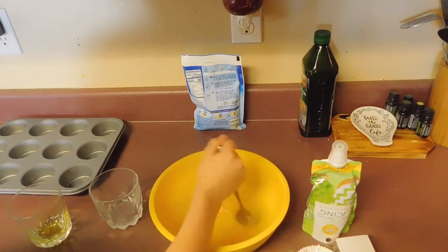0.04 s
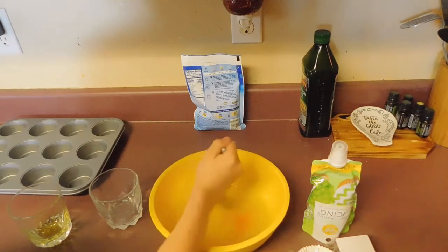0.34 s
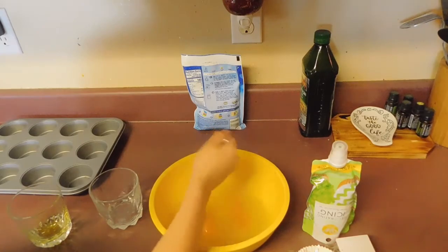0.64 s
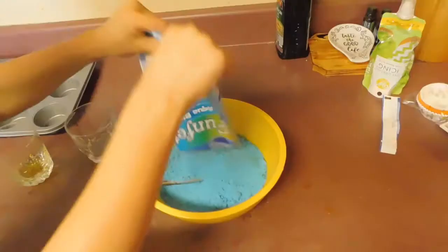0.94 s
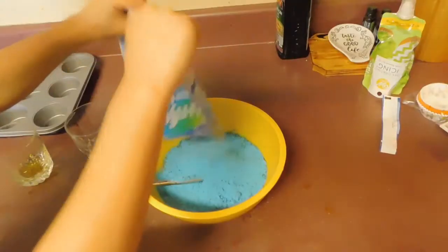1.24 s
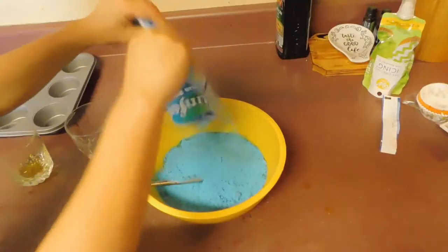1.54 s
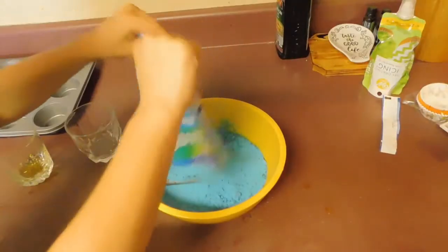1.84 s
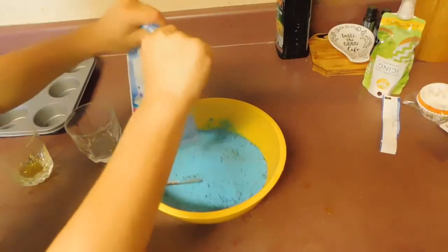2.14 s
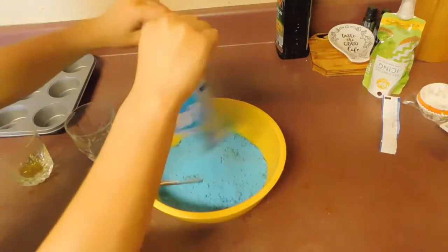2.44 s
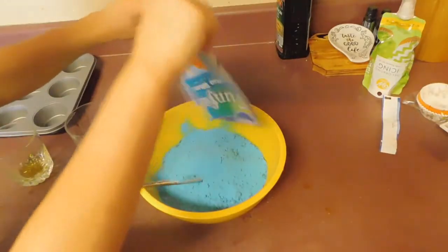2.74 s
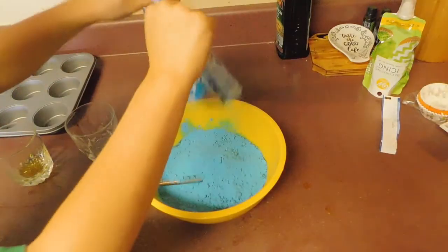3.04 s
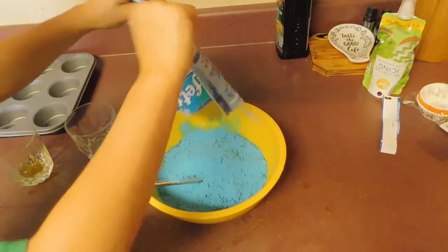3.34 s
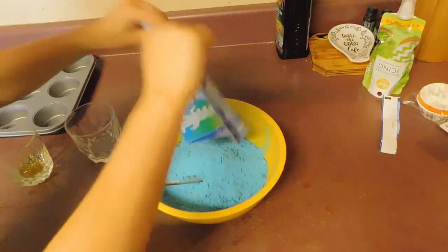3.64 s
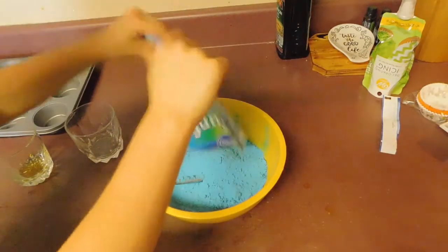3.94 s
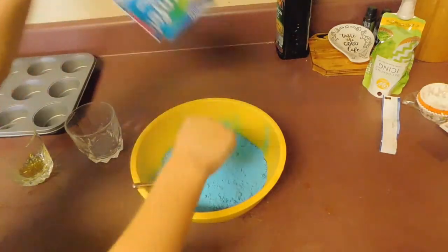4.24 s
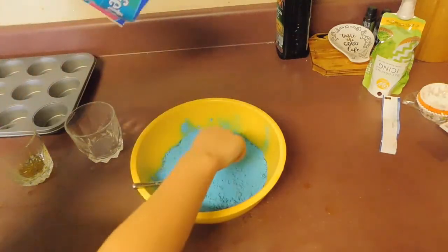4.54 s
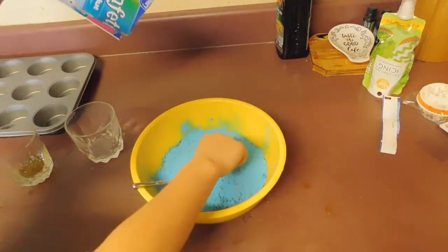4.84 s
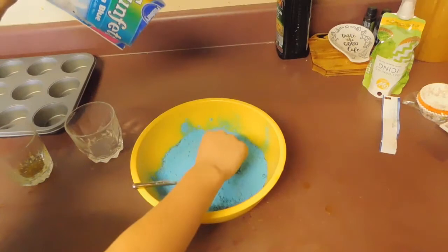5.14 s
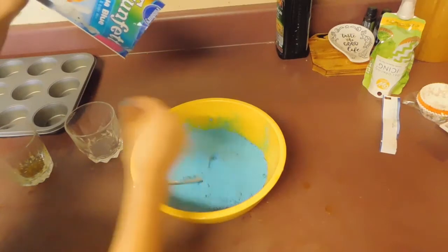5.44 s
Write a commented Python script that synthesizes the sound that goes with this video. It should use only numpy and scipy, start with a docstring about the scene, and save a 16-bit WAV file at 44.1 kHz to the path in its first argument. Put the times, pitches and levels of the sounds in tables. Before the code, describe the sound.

A wire whisk knocks and scrapes in a plastic bowl, then a plastic bag crinkles and snaps as powder is shaken out.

```python
"""Whisk and cake mix, close up

A small kitchen, a stereo pair close over a plastic mixing bowl. A wire whisk knocks three times and
scrapes round in circles, fading out at one second. It settles with a clink, and a plastic bag of cake
mix is shaken empty: the film snaps and crinkles, powder hisses out, the air in the bowl rings along.
Counter and wall answer briefly. At the end, over a quiet hum, a hand moves in the powder."""
import sys
import numpy as np
from scipy import signal
from scipy.fft import rfft, irfft, next_fast_len
from scipy.io import wavfile
from scipy.ndimage import uniform_filter1d

SR = 44100
rng = np.random.default_rng(int(sys.argv[2]) if len(sys.argv) > 2 else 0)


def unload_audio(sound):
    """Save the sound as a 16-bit wav file, at the path given as the first command line argument."""
    columns = np.transpose(np.atleast_2d(sound))
    # keep every value between -1 and 1, then stretch to whole-number steps
    steps = np.round(np.clip(columns, -1, 1) * 32767)
    wavfile.write(sys.argv[1], SR, steps.astype(np.int16))


N = 251346
TIME = np.arange(N) / SR
HZ = np.fft.rfftfreq(4096, 1 / SR)  # grid of the filter curves

# how alike the two microphones hear the room air, close sources and the tail: frequency_hz, likeness
AIR_LIKENESS = [(60, 1), (130, 0.38), (300, 0.67), (700, 0.046), (3000, 0)]
CLOSE_LIKENESS = [(300, 1), (1300, 0.97), (2600, 0.56), (7000, 0.36)]
TAIL_LIKENESS = [(300, .9), (1200, .65), (3000, .15), (7000, 0)]
# gain added at the right microphone and taken from the left: frequency_hz, gain_db
RIGHT_LEAN = [(1200, 0), (2200, 0.96), (15000, .5)]
# air of the still kitchen: frequency_hz, level_db
AIR_SPECTRUM = [(25, -5), (100, -7.5), (300, -14), (780, -9.5), (1500, -12), (6000, -28.5), (16000, -31)]
# time the kitchen takes to die away by 60 dB: frequency_hz, decay_s
ROOM_DECAY = [(200, 0.5), (1500, 0.31), (5000, 0.11), (14000, 0.098)]

# the hand leaving the powder: start_s, length_s, level_db
HAND_STROKES = [(5.592, 0.051, -57)]
# soft touches on the bowl: start_s, level_db, pitch_hz
TOUCHES = [(5.487, -55, 1053), (5.655, -58, 466)]

# wires of the settling whisk: pitch_hz, level_db
CLINK_MODES = [(711, -21.5), (1950, -14.5), (2510, -2.5), (2826, -5), (3354, -15)]
# pushes of the whisk along the bowl's wall: start_s, length_s, level_db, relative_treble_db
WHISK_PUSHES = [(-0.02, 0.0093, -30, -16), (0.232, 0.11, -33.5, -8.5), (0.416, 0.1, -33, -1),
                (0.586, 0.07, -28.5, -4), (0.686, 0.047, -31.5, -5), (0.883, 0.041, -42, 4)]
# resonances of the rubbing wires: pitch_hz, width_hz, level_db
WIRE_MODES = [(682, 122, -5.5), (799, 220, -12.5), (1646, 210, -10.5), (2520, 110, -12), (2694, 290, -1.5),
              (3117, 454, -6.5), (3997, 560, -11)]
# thin upper modes of the wires: pitch_hz
UPPER_WIRE_MODES = [4320, 5060, 6100, 7400, 9600, 11560, 12450]
# the circling whisk climbs and sinks along the wall, taking its resonances along: time_s, shift_hz
CIRCLE_SWING = [(.24, -19.5), (.335, 50.5), (.43, -34.5), (.53, 33.5), (.595, 52), (.69, -51), (.81, -49),
                (.92, 49)]
# rasp of wire on plastic: frequency_hz, level_db
SCRAPE_SPECTRUM = [(60, -23), (200, -9), (450, -12.5), (1100, -0.5), (2050, -14.5), (2700, -2), (8000, -7),
                   (10000, -13), (12500, -8.5), (16000, -35)]
# whisk against bowl: start_s, level_db, relative_treble_db, wire_pitch_hz
WHISK_KNOCKS = [(0.037, -15.5, -11, 2450), (0.1, -14, -10.5, 3146), (0.1582, -17.5, -11, 2583)]
# resonances of the struck bowl: pitch_hz, width_hz, level_db
BOWL_MODES = [(181.6, 21, -10.5), (246, 45, -13.5), (801, 93, -0.5), (1310, 50, -8), (1760, 490, -13.5),
              (2430, 28, -9.5), (2880, 90, -6)]
# clack of the landing wires: frequency_hz, level_db
CLACK_SPECTRUM = [(85, -30.5), (130, -10.5), (210, -11.5), (500, -14.5), (780, 1), (2150, -12), (3300, 3),
                  (16000, -30.5)]

# air in the bowl under the bag: pitch_hz, width_hz, level_db
CAVITY_MODES = [(176, 31, -4), (715, 70, 0.5), (1326, 75, -0.5)]
# sound of the bag's plastic film: frequency_hz, level_db
FILM_SPECTRUM = [(35, -35), (170, -20), (270, -20.5), (350, -11), (440, -16), (560, -10), (1600, -5.5),
                 (2500, -4), (3700, -9), (5200, -16), (12500, -24), (16000, -32)]
# shakes of the bag: start_s, length_s, crinkle_db, powder_db
BAG_SHAKES = [(1.024, 0.028, -38.5, -41), (1.315, 0.11, -35, -41.5), (1.472, 0.13, -36.5, -41),
              (1.684, 0.057, -35, -35), (1.867, 0.2, -34, -39), (2.211, 0.28, -32.5, -38.5),
              (2.558, 0.32, -36, -40), (2.946, 0.048, -44.5, -64), (3.24, 0.037, -42, -46),
              (3.397, 0.1, -38.5, -46.5), (3.865, 0.042, -50, -52)]
# whole folds giving way: start_s, level_db, relative_treble_db
FOLD_CRUMPLES = [(1.374, -29.5, -1), (2.013, -28.5, -22), (2.083, -28.5, -5.5), (2.282, -41, -2),
                 (2.619, -33, -7.5), (2.722, -33.5, -4), (2.771, -34, -9.5), (2.847, -28.5, -7.5),
                 (3.472, -33, -5.5), (3.71, -46.5, -27), (3.874, -39.5, -22.5), (3.951, -38.5, -19.5)]
# single buckles of the film: start_s, level_db, relative_treble_db, panel_pitch_hz
FILM_SNAPS = [(1.1309, -35, -1.5, 1760), (1.221, -36.5, -19.5, 1770), (1.3048, -39, -2.5, 1610),
              (1.333, -33, -10, 1180), (1.3543, -22.5, 1.5, 1650), (1.4242, -31.5, 0, 1060),
              (1.4696, -30, -8, 1700), (1.5228, -28, -6.5, 2100), (1.5297, -21, -9, 2100),
              (1.546, -39, -7, 2220), (1.7001, -18, -5, 2200), (1.7669, -21.5, -6, 2850),
              (1.8051, -36, 5, 2630), (1.854, -31, -13, 1310), (1.893, -27, 1.5, 1300),
              (1.943, -39, -14, 1620), (1.9609, -29, 0.5, 1620), (2.0289, -24.5, 0.5, 2550),
              (2.0537, -26.5, -5.5, 560), (2.0703, -28.5, -17, 1950), (2.225, -35.5, 2, 1930),
              (2.2454, -27.5, -3, 1420), (2.2875, -26, 4.5, 1540), (2.41, -34, -12, 1340),
              (2.4316, -29.5, 3.5, 2190), (2.443, -24, -3, 2210), (2.495, -31, -6, 1320),
              (2.529, -31, -4, 1390), (2.5779, -29.5, 4.5, 1280), (2.608, -32, -3.5, 1330),
              (2.6316, -28.5, 0.5, 1870), (2.6727, -35, 2.5, 1310), (2.696, -35.5, 2.5, 2210),
              (2.7669, -26, -7.5, 1360), (2.8011, -28, 8.5, 6300), (2.901, -35.5, 2.5, 1410),
              (3.034, -34, -17, 1250), (3.098, -39.5, -16, 1400), (3.1276, -37.5, -19, 1880),
              (3.2398, -35.5, -16, 2100), (3.2568, -33, -8.5, 1610), (3.309, -35, -20, 1280),
              (3.3202, -28.5, -23, 1920), (3.3859, -26.5, 0.5, 2620), (3.6, -37, -4, 1190),
              (3.7355, -34.5, -22, 1520), (3.799, -37.5, -34, 1360), (3.8928, -24.5, -15.5, 2840)]


def amp(db):
    """Decibels to gain."""
    return 10 ** (np.asarray(db) / 20)


def unit(x):
    """Scales to rms 1."""
    return x / np.sqrt(np.mean(x ** 2) + 1e-20)


def read(points, hz):
    """Joins spectrum points on a log-frequency axis."""
    f, value = np.transpose(points)
    return np.interp(np.log(hz + 1), np.log(f + 1), value)


def add(mix, start_s, sound):
    """Mixes a sound in at start_s."""
    part = mix[:, max(round(start_s * SR), 0):][:, :sound.shape[-1]]
    part += sound[..., :part.shape[1]]


def tint(x, db):
    """Minimum-phase filter with the gain db on the grid HZ."""
    log_gain = np.log(amp(np.maximum(db, db.max() - 90)))
    mirrored = np.concatenate([log_gain, log_gain[-2:0:-1]])
    taps = np.fft.ifft(np.exp(np.conj(signal.hilbert(mirrored)))).real
    return signal.fftconvolve(x, taps[None], axes=1)[:, :x.shape[1]]


def noise(count, likeness=CLOSE_LIKENESS):
    """White noise at the two microphones, as alike as asked at each frequency."""
    size = next_fast_len(count)
    a, b = rfft(rng.standard_normal((2, size)))
    same = read(likeness, np.fft.rfftfreq(size, 1 / SR))
    common, apart = a * np.sqrt((1 + same) / 2), b * np.sqrt((1 - same) / 2)
    return irfft(np.array([common + apart, common - apart]), size)[:, :count]


def split(x, crossover_hz=4500):
    """Body and treble of a sound."""
    return [signal.sosfilt(signal.butter(3, crossover_hz, side, fs=SR, output="sos"), x)
            for side in ("low", "high")]


def at_level(sound, db, treble_db, span_s):
    """Gives body and treble the energy of their levels held for span_s."""
    body, treble = (unit(part) * np.sqrt(span_s * SR / sound.shape[1]) for part in split(sound))
    return amp(db) * (body + amp(treble_db) * treble)


def resonate(x, hz, width_hz):
    """A resonance of gain 1 that can follow a moving frequency."""
    turn = np.exp(2j * np.pi * np.cumsum(hz * np.ones(x.shape[1])) / SR)
    pole = np.exp(-np.pi * width_hz / SR)
    return 2 * (turn * signal.lfilter([1 - pole], [1, -pole], x / turn + 1e-18)).real


def wander(count, per_s):
    """A random curve gliding through per_s values a second, mostly within 1 of zero."""
    knots = rng.standard_normal(256)
    return np.interp(np.arange(count) / SR * per_s, np.arange(256), knots)


def grains(per_s, spread_db, ring_s, bed):
    """Random tiny bursts of uneven size over a weak even bed, at a steady overall strength."""
    sizes = amp(spread_db * np.minimum(rng.exponential(1, N), 3))
    onsets = rng.random(N) < per_s / SR
    power = signal.lfilter([1], [1, -np.exp(-2 / (ring_s * SR))], onsets * sizes ** 2)
    power = power / power.mean() + bed
    return noise(N) * np.sqrt(power / uniform_filter1d(power, SR // 16))


def stroke(start_s, length_s, rise_s, fall_db_per_s):
    """Envelope of one movement: it rises, holds to the end of its length, then dies away."""
    t = TIME - start_s
    return np.clip(t / rise_s, 0, 1) * amp(-fall_db_per_s * np.maximum(t - length_s, 0))


def together(gains):
    """Strength of unrelated sounds heard at once."""
    return np.sqrt(sum(g ** 2 for g in gains))


def panel_colour(pitch_hz, lift_db=5, width_share=0.52, thin_db=5):
    """Filter curve of a plastic panel, which stresses its own note and radiates less below it."""
    note_db = lift_db / (1 + (2 * (HZ / pitch_hz - 1) / width_share) ** 2)
    bass_loss_db = thin_db / (1 + (2 * HZ / pitch_hz) ** 4)
    return read(FILM_SPECTRUM, HZ) + note_db - bass_loss_db


def room_tone(air_db=-60, hum_hz=44, hum_db=-73, waver_rad=.8):
    """Steady air all round the microphones, with a faint, deep, wavering hum."""
    air = unit(tint(noise(N, AIR_LIKENESS), read(AIR_SPECTRUM, HZ)))
    hum = unit(np.sin(2 * np.pi * hum_hz * TIME + waver_rad * wander(N, per_s=6.5)))
    return amp(air_db) * air + amp(hum_db) * hum


def kitchen(direct, early_db, tail_db, early_s=0.012):
    """The direct sound, quick echoes off the nearby counter and wall, then a short diffuse tail."""
    t = TIME[:SR // 2]
    hz, frame_s, spectra = signal.stft(noise(len(t), TAIL_LIKENESS), SR, nperseg=256)
    decay = amp(-60 * frame_s / read(ROOM_DECAY, hz)[:, None])
    tail = signal.istft(spectra * decay, SR, nperseg=256)[1][:, :len(t)]
    tail = unit(tail * np.minimum(t / 0.0047, 1))
    early = unit(noise(len(t)) * np.exp(-t / early_s) * (t > .002))
    echoes = (amp(early_db) * early + amp(tail_db) * tail) / np.sqrt(len(t))
    return direct + signal.fftconvolve(direct, echoes, axes=1)[:, :N]


def hand_in_powder():
    """A hand moves in the powder: a soft hiss, just above the room tone."""
    stirring = together(amp(db) * stroke(start_s, length_s, rise_s=0.069, fall_db_per_s=172.5)
                        for start_s, length_s, db in HAND_STROKES)
    return stirring * unit(tint(noise(N), read(FILM_SPECTRUM, HZ)))


def bowl_touches(ring_s=0.0053):
    """Dull, short notes of the bowl touched by the hand."""
    out, t = np.zeros((2, N)), TIME[:SR // 10]
    for start_s, db, hz in TOUCHES:
        add(out, start_s, 2 * amp(db) * np.exp(-t / ring_s) * np.sin(2 * np.pi * hz * t))
    return out


def whisk_clink(start_s=1.0258, level_db=-40, t60_s=.07, strike_s=0.01, clack_db=-3):
    """The resting whisk shifts against the bowl: a clack that sets its wires ringing briefly."""
    out, t = np.zeros((2, N)), TIME[:SR // 4]
    blow = noise(len(t)) * np.exp(-t / strike_s)
    width_hz = np.log(1000) / np.pi / t60_s
    ring = sum(amp(db) * resonate(blow, hz, width_hz) for hz, db in CLINK_MODES)
    clack = tint(blow, panel_colour(pitch_hz=2400))
    add(out, start_s, amp(level_db) * (unit(ring) + amp(clack_db) * unit(clack)))
    return out


def wire_shimmer(slips, width_hz=110, flicker_db=5, bend=0.02):
    """The thin upper modes, each swelling, bending and fading as its wire touches and lifts."""
    out, count = np.zeros_like(slips), slips.shape[1]
    for hz in UPPER_WIRE_MODES:
        swell = amp(read(SCRAPE_SPECTRUM, hz) + flicker_db * wander(count, per_s=22))
        bent_hz = hz * (1 + bend * wander(count, per_s=12))
        out += swell * resonate(slips, bent_hz, width_hz)
    return out


def whisk_scrape(rasp_db=-16, shimmer_db=-8, glide_db=-34, glide_treble_db=-44, gain_db=-1,
                 drift=0.011, flicker_db=3):
    """Stick and slip drives the wires; their resonances swing with each circle round the bowl."""
    count = SR + SR // 10
    # between pushes the wires glide lightly on
    body_gains, treble_gains = [amp(glide_db)], [amp(glide_treble_db)]
    for start_s, length_s, db, treble_db in WHISK_PUSHES:
        push = amp(db) * stroke(start_s, length_s, rise_s=0.022, fall_db_per_s=158)[:count]
        body_gains.append(push)
        treble_gains.append(push * amp(treble_db))
    force, edge = together(body_gains), together(treble_gains)
    swing_hz = np.interp(TIME[:count], *np.transpose(CIRCLE_SWING))
    slips = grains(per_s=700, spread_db=2.5, ring_s=0.0022, bed=0.37)[:, :count]
    rasp = tint(slips, read(SCRAPE_SPECTRUM, HZ))
    sound = amp(rasp_db) * rasp + amp(shimmer_db) * wire_shimmer(slips)
    for hz, width_hz, mode_db in WIRE_MODES:
        swing_share, bite = (1, -1) if hz < 2000 else (0.98, 1)  # a hard push favours the high modes
        moving_hz = hz * (1 + drift * wander(count, per_s=53)) + swing_share * swing_hz
        contact = amp(mode_db + flicker_db * wander(count, per_s=21.47)) * unit(force) ** bite
        sound += contact * resonate(resonate(slips, moving_hz, width_hz), moving_hz, width_hz)
    body, treble = split(sound)
    out = np.zeros((2, N))
    add(out, 0, amp(gain_db) * (force * unit(body) + edge * unit(treble)))
    return out


def whisk_knocks(chatter_s=0.015, clack_db=-14, shove_db=4, shove_s=0.00025, wire_db=4):
    """The whisk shoves the wall, a hollow thump; its wires land in a chatter and the bowl rings."""
    out, t = np.zeros((2, N)), TIME[:SR // 4]
    landing = np.minimum(t / .002, 1)
    shove = amp(shove_db) * t / shove_s * np.exp(-t / shove_s)
    for start_s, db, treble_db, wire_hz in WHISK_KNOCKS:
        blow = noise(len(t)) * np.exp(-t / chatter_s) * landing
        bowl = sum(amp(mode_db) * resonate(blow + shove, hz, width) for hz, width, mode_db in BOWL_MODES)
        wire = amp(wire_db) * resonate(blow, wire_hz, width_hz=45)
        clack = amp(clack_db) * tint(blow, read(CLACK_SPECTRUM, HZ))
        add(out, start_s, at_level(bowl + wire + clack, db, treble_db, span_s=0.0091))
    return out


def bowl_cavity(sound, drift=.02):
    """The air in the bowl rings along with the sound above it, and shifts as the bag swings."""
    swing = 1 + drift * wander(N, per_s=7)
    return sound + sum(amp(db) * resonate(sound, hz * swing, width) for hz, width, db in CAVITY_MODES)


def bag_shakes(crinkle_db=-2, fizz_db=-7, powder_db=-5, held_db=-56, held_until_s=4.024,
               rise_s=0.023, crinkle_fall_db_per_s=102, powder_fall_db_per_s=73):
    """At each shake countless small creases crackle and powder slides down the film."""
    first_s = BAG_SHAKES[0][0]
    # the film creaks faintly as long as the bag is held over the bowl
    held = amp(held_db) * stroke(first_s, held_until_s - first_s, rise_s, crinkle_fall_db_per_s)
    flexes, pours = [held], []
    for start_s, length_s, flex_db, pour_db in BAG_SHAKES:
        flexes.append(amp(flex_db) * stroke(start_s, length_s, rise_s, crinkle_fall_db_per_s))
        pours.append(amp(pour_db) * stroke(start_s, length_s, rise_s, powder_fall_db_per_s))
    creases = sum(tint(grains(per_s=70, spread_db=2.5, ring_s=0.0051, bed=0.15), panel_colour(hz))
                  for hz in (1150, 1700, 2450))
    body, fizz = split(creases)
    _, hiss = split(tint(noise(N), read(FILM_SPECTRUM, HZ)))
    crinkle = amp(crinkle_db) * unit(body)
    powder = amp(fizz_db) * unit(fizz) + amp(powder_db) * unit(hiss)
    return together(flexes) * crinkle + together(pours) * powder


def bag_crumples(pitch_hz=1500, swell_s=0.0028, uneven_db=5, gain_db=-1):
    """A fold collapses in a quick, uneven run of small buckles that swells and dies."""
    out, t = np.zeros((2, N)), TIME[:SR // 10]
    swell = np.sqrt(t / swell_s) * np.exp(-t / swell_s / 2)
    colour = panel_colour(pitch_hz, width_share=.8)
    for start_s, db, treble_db in FOLD_CRUMPLES:
        buckles = noise(len(t)) * swell * amp(uneven_db * wander(len(t), per_s=970))
        add(out, start_s, at_level(tint(buckles, colour), db + gain_db, treble_db, span_s=0.038))
    return out


def bag_snaps(tick_gain=2.13, typical_db=-26, tick_s=0.00023, ring_s=0.0053, shiver_db=-6,
              gain_db=1, treble_lift_db=1):
    """A crease pops through with a tick, then the panel shivers on its note for a few milliseconds."""
    out, t = np.zeros((2, N)), TIME[:SR // 16]
    for start_s, db, treble_db, pitch_hz in FILM_SNAPS:
        hardness = tick_gain * amp(treble_db / 2 + (db - typical_db) / 4)  # harder if bright or loud
        envelope = hardness * np.exp(-t / tick_s) + np.exp(-t / ring_s)
        pop = tint(noise(len(t)) * envelope, panel_colour(pitch_hz))
        shiver = amp(shiver_db) * resonate(pop, pitch_hz, width_hz=220)
        add(out, start_s, at_level(pop + shiver, db + gain_db, treble_db + treble_lift_db, span_s=0.005))
    return out


def scene():
    """Whisk, then bag, close up in the kitchen; their treble leans to the right microphone."""
    whisk = kitchen(whisk_knocks() + whisk_scrape(), early_db=-7, tail_db=-9.5) * (TIME < 1)
    over_bowl = bowl_cavity(bag_snaps() + bag_crumples() + bag_shakes() + hand_in_powder())
    pouring = kitchen(over_bowl + whisk_clink() + bowl_touches(), early_db=-8, tail_db=-8)
    lean = amp(np.array([[-1], [1]]) * read(RIGHT_LEAN, np.fft.rfftfreq(N, 1 / SR)))
    return irfft(rfft(whisk + pouring) * lean, N) + room_tone()


def record(dry, ceiling=.8, band_limit_hz=16200):
    """A brief fade to silence between the two actions, rounding of the highest peaks, a band limit."""
    fade = np.interp(TIME, [.93, .99, 1.012, 1.022], [1, 0, 0, 1])
    rounded = ceiling * np.tanh(dry * fade / ceiling)
    lowpass = signal.firwin(511, band_limit_hz, window=("kaiser", 9), fs=SR)
    return signal.oaconvolve(rounded, lowpass[None], "same")


dry = scene()
out = record(dry)
unload_audio(out)
```